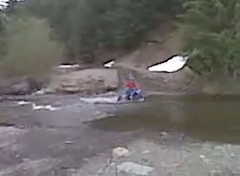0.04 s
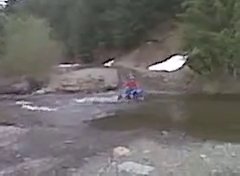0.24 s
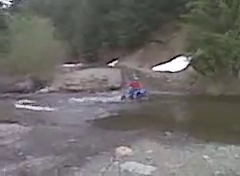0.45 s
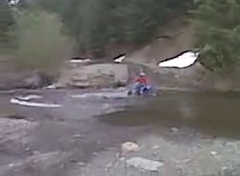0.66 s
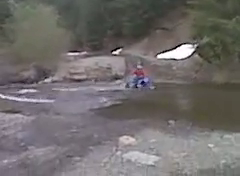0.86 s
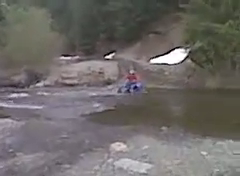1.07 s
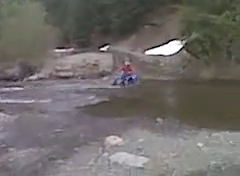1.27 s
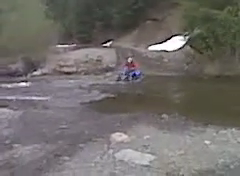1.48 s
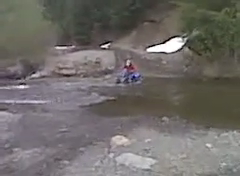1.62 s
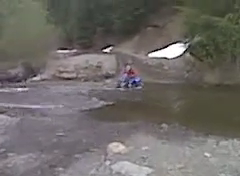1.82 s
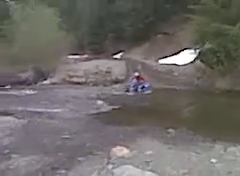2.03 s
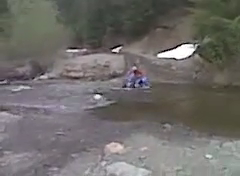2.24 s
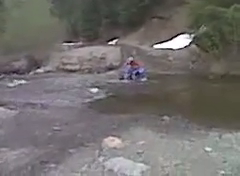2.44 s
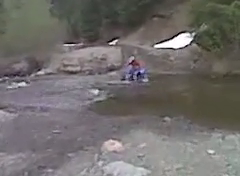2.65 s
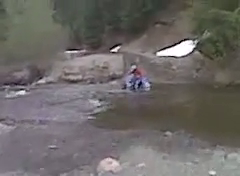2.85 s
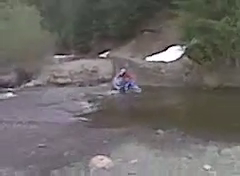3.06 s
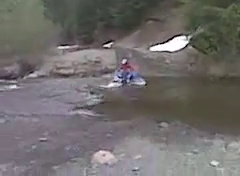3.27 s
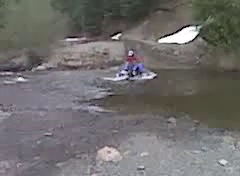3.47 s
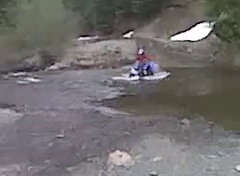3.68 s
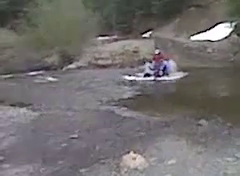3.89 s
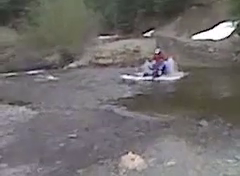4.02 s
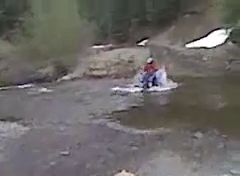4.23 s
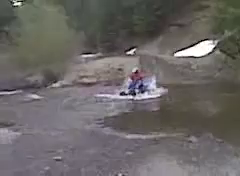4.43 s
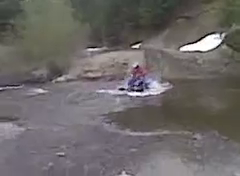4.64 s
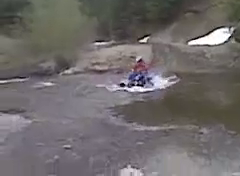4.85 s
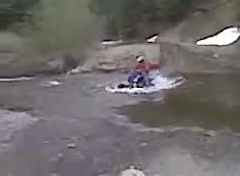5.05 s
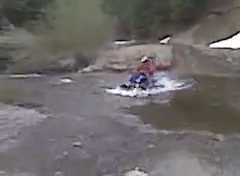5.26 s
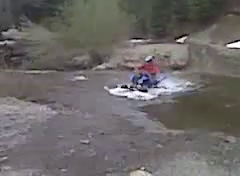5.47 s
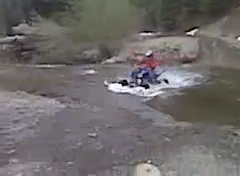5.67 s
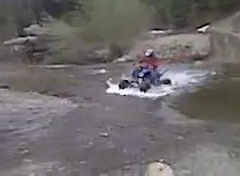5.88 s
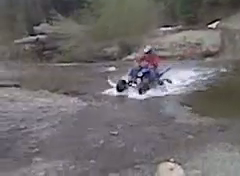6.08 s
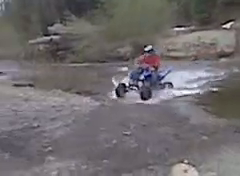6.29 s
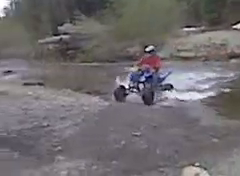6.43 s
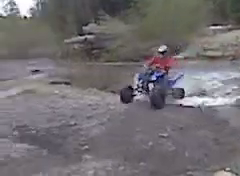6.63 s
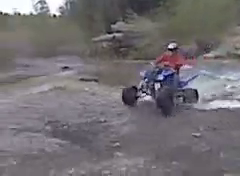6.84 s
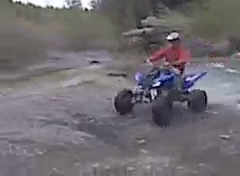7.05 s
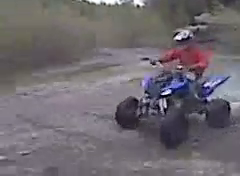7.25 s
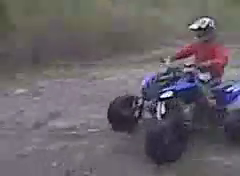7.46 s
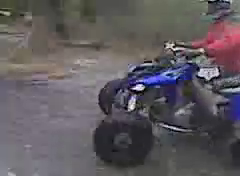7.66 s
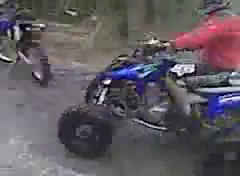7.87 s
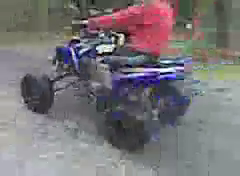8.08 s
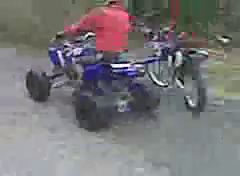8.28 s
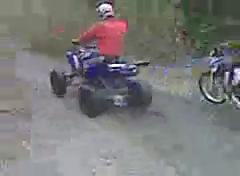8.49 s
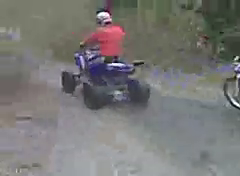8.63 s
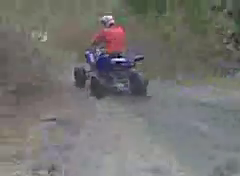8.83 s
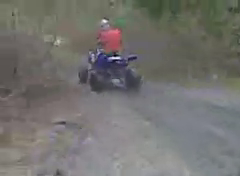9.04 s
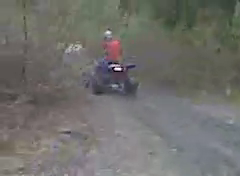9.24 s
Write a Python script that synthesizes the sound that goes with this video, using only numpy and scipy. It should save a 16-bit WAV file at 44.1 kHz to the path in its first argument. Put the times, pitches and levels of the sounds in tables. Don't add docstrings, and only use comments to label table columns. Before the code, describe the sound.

Open air beside a creek, captured by a small, boxy microphone with little treble. For the first 0.9 seconds there is faint running water and a very quiet, distant idle. Then a single-cylinder quad engine revs hard, climbing to a buzzy peak near 1.5 and dropping off by 1.8-2.2. Another raspy surge comes around 2.3, sags near 3.1, and a stronger one rises at 3.4, with a short blip at 4.1. From 4.3 to 7 it holds a rough, throbbing mid pitch, nearing through hissing water, with a push around 6.2. At 7.0-7.3 it revs up, wheels spit gravel, stones knock sharply and the frame rings. It passes extremely close at 7.7-8.1, loud and distorted, with metallic rattling. The throttle drops briefly around 8.1, gravel hisses, then a cracking exhaust pulls away, sputtering unevenly and slowing until 9.3.

```python
import sys
import numpy as np
from scipy import signal
from scipy.fft import rfft, irfft, next_fast_len
from scipy.io import wavfile
from scipy.ndimage import uniform_filter1d, map_coordinates

SR = 44100
rng = np.random.default_rng(int(sys.argv[2]) if len(sys.argv) > 2 else 0)


def master(y):
    cut = np.clip(np.atleast_2d(y).T, -1, 1)
    pcm = np.round(cut * 32767)
    wavfile.write(sys.argv[1], SR, pcm.astype(np.int16))


def invert_db(x):
    u = np.asarray(x, float) / 20
    return 10 ** u


N = 410571

# time in seconds, firing rate the crank then heads for in Hz.
THROTTLE = [(0, 25.7), (.899, 33), (1.06, 67.5), (1.471, 75), (1.63, 44), (1.8, 36), (2.12, 24.3),
            (2.355, 53.5), (2.6, 33.2), (2.711, 38), (3.09, 24.8), (3.38, 66), (3.7, 59.5), (3.98, 40),
            (4.1, 55), (4.31, 36.5), (4.6, 40), (4.89, 45), (5, 40), (5.33, 35), (5.57, 41), (5.98, 38.6),
            (6.14, 52), (6.4, 46.5), (6.65, 37), (7, 60), (7.13, 62), (7.3, 23.3), (7.5, 39.7), (7.744, 47),
            (8.1, 9.5), (8.201, 31), (8.69, 22.9)]
LOAD_DB = [-32, -2.5, -0.3, 5.5, -3.5, -3, -11, -1.5, -1.5, -0.8, -4.5, 0, 0.9, -0.3, 0.3, -1.3, -1, -4, -1,
           -0.7, -2, 1.5, 1.5, 1.5, 2, -0.5, 0.3, -1, -3.5, 1, -8, -1, -5.5]
FLYWHEEL_S, CABLE_S = .3, .08
BREATH_S = .035
# time in seconds, distance in m, side shown (0 nose, 1 flank, 2 tail).
PATH = [(0, 25.5, 0.16), (3.2, 28.3, 0.166), (4.8, 16.4, 0), (6.2, 11.4, 0), (6.9, 6.9, 0.25),
        (7.25, 5.35, 0.27), (7.5, 3.4, .5), (7.66, 2.7, .62), (7.735, 2.6, .8), (7.768, 1.9, 1),
        (8.045, 2.06, 1), (8.08, 2.8, 1.1), (8.13, 3.2, 1.26), (8.28, 3.3, 1.5), (8.52, 3.4, 2),
        (9.31, 5.8, 3.5)]
FAR_M, CRUISE_HZ = 30, 40
FIRING_DUE_S = [.95, .99, 1.032, 1.098, 1.153, 1.228, 1.308, 2.381, 2.441, 2.514, 2.61, 2.702, 2.8, 2.876, 2.954,
                3.041, 3.109, 7.748, 7.85, 7.948, 8.037, 8.294, 8.415, 8.511, 8.633, 8.701, 8.8, 8.941, 9.053,
                9.169, 9.287]
# time in seconds, unevenness from 0 to 1.
UNEVEN = [(0, .6), (.9, .12), (1.2, .1), (1.3, .03), (2.1, .04), (2.28, .25), (2.42, .08), (2.7, .06),
          (3.05, .1), (3.2, .35), (3.55, .25), (3.75, .1), (4.3, .1), (4.6, .35), (7, .3), (7.5, .6),
          (7.72, .12), (8.02, .12), (8.15, .7), (8.28, .12), (9.31, .3)]
# time in seconds, change in dB.
ODD_FIRINGS = [(8.3, 2), (8.331, 3.5), (8.36, 2.5), (8.635, 4.5), (8.701, -3.5), (8.801, 2.5), (8.838, -15),
               (8.872, 4.5), (8.906, 1.5), (8.98, -16), (9.016, 2), (9.089, -3), (9.129, -9), (9.169, 4),
               (9.21, -9), (9.25, -10.5), (9.291, -15)]
# delay in seconds, level in dB.
HEADER = [(.0041, 1), (.0079, 1), (0.0122, 1.5)]
# dB far off at plain load, share of load, share of nearness, dB gained at the flank,
# narrowness of that beam, dB gained behind.
THUMP = (-24, 0.77, 0.302, -18.5, 1.14, -8)
PIPE = (-28, 1.38, 0.0185, 17.5, 3.5, -2)
TAIL = (-29, 1.74, 0.56, -8.5, 2.5, 4.5)

# pitch in Hz, width in Hz, level in dB.
SILENCER = [(212.5, 80, 1.96), (298.4, 82, 4.5)]
# pitch in Hz, width in Hz, level in dB.
PIPE_FRONT = [(443, 280, -1), (592, 120, 0.013)]
# pitch in Hz, width in Hz, level in dB.
PIPE_FLANK = [(616.8, 54, 0)]
# pitch in Hz, width in Hz, level in dB.
TAIL_BEHIND = [(773, 115, 2), (1020, 400, -4.5)]
# pitch in Hz, width in Hz, level in dB.
CASING = [(2190, 190, -9.5), (2440, 320, 4.5), (2640, 200, 0.5), (3280, 160, -1)]
# pitch in Hz, width in Hz, level in dB.
VALVES = [(3037, 400, 0)]
# pitch in Hz, width in Hz, level in dB.
CRACK = [(1970, 570, 1.5), (2700, 280, 4), (3160, 210, -13)]
# time in seconds, pitch in Hz, level in
# dB.
BARK = [(.9, 850, 1), (1.2, 850, 1), (1.4, 825, 2), (1.6, 885, 1), (1.8, 945, 0), (2.0, 890, 0),
        (2.4, 945, 4), (2.48, 940, 1), (2.54, 825, 2), (2.64, 900, 6), (2.74, 830, 5), (2.88, 830, 3),
        (2.97, 890, 1), (3.1, 850, -4), (3.45, 870, 0), (3.8, 870, -3), (3.97, 900, 2), (4.1, 880, -3),
        (6, 870, 0), (6.5, 870, -4), (6.7, 930, -1), (6.9, 870, -3), (7.1, 900, 0), (8, 850, 0)]
BARK_HZ, BARK_STEP_HZ, BARK_WIDE_HZ, BARK_DRAWN = (820, 885, 950), 65, 115, .4
WADING, WADING_DULLS = (4.3, 2.3, 0), 0.49
SHUT = (1.68, .12, -7)
CLATTER_DB, CLATTER_DB_PER_OCTAVE = -37, 9
VALVE_FLOAT_HZ, IN_STEP, IN_STEP_BEHIND = 58, .13, .45
# start in seconds, hold in seconds, level in dB.
DRONE = [(1.209, 0.091, -33), (1.3, 0.14, -29.5), (1.54, .12, -26.5), (1.7, 0.07, -29.5), (1.87, 0.22, -40),
         (2.551, 0.34, -43.5), (3.538, 0.21, -30), (3.88, 0.076, -27.5), (4.061, 0.3, -19.5),
         (6.3, 0.16, -31.5), (7.019, 0.33, -30.5)]
# start in seconds, hold in seconds, level in dB,
# multiple of the firing rate.
HOWL = [(1.36, .2, -36, 8), (1.38, .2, -37, 7), (1.4, .2, -38, 9), (1.34, .15, -38, 14),
        (1.36, .22, -36, 11), (1.45, .12, -35, 15), (1.52, .1, -33, 10), (1.52, .1, -32, 14),
        (1.6, .06, -36, 12), (1.71, .12, -33, 8), (1.75, .1, -38, 11), (1.78, .05, -37, 18),
        (1.8, .3, -35, 6), (1.9, .06, -37, 12), (2.62, .12, -39, 12), (2.7, .1, -37, 7),
        (2.93, .13, -35, 7), (3.47, .1, -33, 6), (3.68, .06, -30, 5), (3.76, .22, -34, 10),
        (3.8, .2, -37, 12), (3.88, .06, -34, 6), (4.1, .13, -31, 5), (4.42, .1, -32, 6),
        (4.55, .12, -33, 7), (4.95, .2, -33, 8), (5.05, .12, -31, 7), (5.42, .06, -33, 16),
        (5.55, .2, -35, 6), (5.6, .2, -32, 7), (6, .15, -30, 5), (6, .13, -31, 6), (6.24, .16, -29, 5),
        (6.2, .22, -29, 7), (6.75, .25, -35, 6), (6.75, .25, -31, 7), (6.75, .25, -33, 8)]
ATTACK_S, RELEASE_S = .06, .11

# pitch in Hz, level in dB.
WATER = [(35, -46), (60, -17), (129, -11.5), (225, -8.5), (300, -2), (414, -9), (532, -0.5), (1150, -1),
         (1560, -8.5), (2150, -4.5), (3240, -11.5), (4310, -33.5), (5600, -58.5), (9480, -120)]
CREEK_DB, SPRAY_DB, SPRAY_DB_PER_OCTAVE, SPRAY_NEAR = -49.5, -47, 14, 0.94
# start in seconds, hold in seconds, level in dB.
WHEELSPIN = [
    (7.127, 0.19, -38),
    (8.1, 0.16, -37),
]
# start in seconds, hold in seconds, level in dB, pitch in Hz.
FRAME = [
    (6.37, 0.033, -30, 1256),
    (6.55, 0.45, -31.5, 1238),
    (7.03, 0.24, -17, 1256),
    (7.28, 0.07, -18.5, 1265),
    (7.5, 0.17, -28, 1235),
    (7.74, 0.1, -20.5, 1254),
]
# start in seconds, hold in seconds, level in dB, pitch in Hz.
RACK = [
    (6.65, .3, -31, 2613),
    (7.2, .03, -23, 2620),
    (7.34, 0.021, -25.5, 2700),
    (7.5, 0.0406, -29, 2550),
    (7.8, .15, -21.5, 2354),
    (8.01, 0.031, -16.5, 2230),
    (8.09, 0.018, -25, 2605),
    (8.2, 0.076, -23, 2080),
]
# time in seconds, peak in dB.
STONES = [
    (7.1495, 1),
    (7.2237, -1),
    (7.2555, 2.5),
    (7.44, -6),
    (7.52, -6),
]
# pitch in Hz, width in Hz, level in dB.
PLATE = [(930, 440, 5), (2200, 470, -1.5)]
PREAMP_TOP, PREAMP_KNEE = 1.1, 7


def steady(x):
    power = uniform_filter1d(uniform_filter1d(x ** 2, SR // 9), SR // 9)
    return x / np.sqrt(np.abs(power) + 1e-12)


def curves(rows):
    s, *cols = np.transpose(rows)
    return [np.interp(np.arange(N) / SR, s, c) for c in cols]


def wobble(rate):
    knots = rng.standard_normal(int(N * rate / SR) + 4)
    return map_coordinates(knots, [np.arange(N) * rate / SR])


def swell(start, hold, db):
    t = np.arange(N) / SR - start
    outside = np.maximum(-t / ATTACK_S, (t - hold) / RELEASE_S)
    return invert_db(db - 20 * np.maximum(outside, 0))


def lagged(x, seconds):
    keep = np.exp(-1 / (seconds * SR))
    return x[0] + signal.lfilter([1 - keep], [1, -keep], x - x[0])


def filtered(x, response):
    m = next_fast_len(N + SR // 2)
    return irfft(rfft(x, m) * response(np.fft.rfftfreq(m, 1 / SR)), m)[..., :N]


def ringing(x, modes):
    def response(f):
        return sum(invert_db(db) * 1j * f * w / (c * c - f * f + 1j * f * w) for c, w, db in modes) ** 2
    return filtered(x, response)


def echoes(x, taps):
    return sum(invert_db(db) * np.pad(x, (int(abs(s) * SR), 0))[:N] for s, db in taps)


def patchy(depth_db, wide, long):
    z = signal.stft(rng.standard_normal(N), nperseg=512)[2]
    field = uniform_filter1d(rng.standard_normal(z.shape), wide, axis=0)
    field = uniform_filter1d(field, long, axis=1)
    return signal.istft(z * invert_db(depth_db * field / field.std()), nperseg=512)[1][:N]


def riding():
    s, aim = np.transpose(THROTTLE)
    move = np.clip(np.searchsorted(s, np.arange(N) / SR) - 1, 0, None)
    rate = uniform_filter1d(lagged(aim[move], FLYWHEEL_S), int(CABLE_S * SR))
    load_db = lagged(np.array(LOAD_DB)[move], BREATH_S)
    distance, side = curves(PATH)
    return rate, load_db, 20 * np.log10(FAR_M / distance), np.clip(side, 0, 2)


def crank(rate):
    turns = np.cumsum(rate) / SR
    nudge = np.unwrap(-turns[(np.array(FIRING_DUE_S) * SR).astype(int)] % 1, period=1)
    return turns + np.interp(np.arange(N) / SR, FIRING_DUE_S, nudge)


def firings(turns, uneven):
    fires = np.flatnonzero(np.diff(np.floor(turns))) - int(0.002556 * SR)
    chance = np.clip(rng.standard_normal((len(fires), 2)), -2, 2)
    shift = (uneven[fires] * .0006 * SR * chance[:, 0]).astype(int)
    late = np.clip(fires + shift, 0, N - 1)
    return np.bincount(late, invert_db(4.7 * uneven[fires] * chance[:, 1]), N)


def part_level(part, load_db, near_db, broadside, behind):
    db, loaded, near, flank_db, narrow, behind_db = part
    level = db + loaded * load_db + near * near_db
    level = level + flank_db * broadside ** narrow + behind_db * behind
    return level + 1.5 * (1 - .8 * broadside) * wobble(10)


def intake_drone(turns):
    hum = sum(swell(*row) for row in DRONE) * np.sin(8 * np.pi * turns)
    howl = sum(swell(s, hold, db + 3) * np.sin(2 * np.pi * k * turns) for s, hold, db, k in HOWL)
    return invert_db(3 + 1.5 * wobble(25)) * hum + invert_db(.9 * wobble(20)) * howl


def casing_clatter(puffs, odd_db, behind, rate):
    rattle = steady(ringing(patchy(4.1, 2, 12), CASING))
    spit = rng.standard_normal(N)
    valves = steady(ringing(puffs * spit, VALVES))
    cracks = echoes(puffs ** 0.67 * invert_db(odd_db / 2), [(.004, 0)])
    ticks = (1 - behind) * valves + behind * steady(ringing(cracks * spit, CRACK))
    floating = np.clip((rate - VALVE_FLOAT_HZ) / 3, 0, 1)
    in_step = IN_STEP + IN_STEP_BEHIND * behind + .6 * floating
    return np.sqrt(1 - in_step) * rattle + np.sqrt(in_step) * ticks


def engine():
    rate, load_db, near_db, side = riding()
    turns = crank(rate)
    uneven, = curves(UNEVEN)
    behind = np.clip((side - 1.2) / .4, 0, 1)
    broadside = np.clip(1 - abs(side - 1), 0, 1)
    flank = broadside + behind / 2
    thump_db, pipe_db, tail_db = (part_level(part, load_db, near_db, broadside, behind)
                                  for part in (THUMP, PIPE, TAIL))

    blows = firings(turns, uneven)
    puffs = signal.lfilter([1], [1, -np.exp(-1 / (.008 * SR))], blows)
    drawn_out = blows + echoes(blows, HEADER)
    odd_db = sum(db * (abs(np.arange(N) / SR - s) < .016) for s, db in ODD_FIRINGS)
    outlet = echoes(blows * invert_db(odd_db), [(.0045, 0)])

    def exhaust(source, modes, rough):
        share = np.clip(rough * uneven, 0, 1)
        clean = steady(ringing(source, modes))
        gas = (puffs + 1.1 * puffs.mean()) * rng.standard_normal(N)
        return np.sqrt(1 - share) * clean + np.sqrt(share) * steady(ringing(gas, modes))

    thump = exhaust(echoes(blows + .6 * (1 - behind) * drawn_out, [(.005, 0)]), SILENCER, rough=1.1)

    front = exhaust(blows + .45 * drawn_out, PIPE_FRONT, rough=1.6)
    beside = exhaust(echoes(blows, [(.002, 0)]), PIPE_FLANK, rough=.8)
    pipe = np.sqrt(1 - flank) * front + np.sqrt(flank) * beside
    pipe = pipe * (1 - 0.12 * swell(*WADING) - swell(*SHUT))

    bark_hz, bark_db = curves(BARK)
    bark = 0
    for hz in BARK_HZ:
        share = np.clip(1 - abs(np.clip(bark_hz, 820, 950) - hz) / BARK_STEP_HZ, 0, 1)
        note = exhaust(blows + BARK_DRAWN * drawn_out, [(hz, BARK_WIDE_HZ, 0)], rough=1.7)
        bark = bark + np.sqrt(share) * note
    tail = np.sqrt(1 - behind) * invert_db(bark_db) * bark
    tail = tail + np.sqrt(behind) * exhaust(outlet, TAIL_BEHIND, rough=.6)
    tail = tail * (1 - np.clip(WADING_DULLS * swell(*WADING), 0, 1))

    pulses = invert_db(thump_db - 3.0) * thump + invert_db(pipe_db - 1.0 - 15 * behind) * pipe + invert_db(tail_db - 3.5) * tail

    def open_end(f):
        return (1j * f / 175) ** 2 / (1 + 1.1j * f / 175 - (f / 175) ** 2)

    rumble = steady(ringing(rng.standard_normal(N), [(100, 170, 0)]))
    rumble = invert_db(uniform_filter1d(thump_db, SR // 4) - 19.5) * rumble
    clatter_db = CLATTER_DB + CLATTER_DB_PER_OCTAVE * np.log2(rate / CRUISE_HZ) + near_db
    clatter_db = clatter_db - 0.8 * broadside ** 3 + 0.32 * load_db + 0.46 * wobble(9)
    clatter = invert_db(clatter_db - 1.0) * casing_clatter(puffs, odd_db, behind, rate)
    return filtered(pulses, lambda f: open_end(f) ** 2) + intake_drone(turns) + rumble + clatter


def wash():
    f, db = np.transpose(WATER)
    droplets = patchy(1.87, 4, 8) * invert_db(1.6 * wobble(300))
    hiss = filtered(droplets, lambda hz: invert_db(np.interp(np.log(hz + 1), np.log(f + 1), db)))
    rate, _, near_db, _ = riding()
    spray_db = SPRAY_DB + SPRAY_DB_PER_OCTAVE * np.log2(rate / CRUISE_HZ)
    spray_db = spray_db + SPRAY_NEAR * near_db + 0.69 * wobble(12)
    thrown = invert_db(spray_db) + sum(swell(*row) for row in WHEELSPIN)
    return np.hypot(invert_db(CREEK_DB), thrown) * invert_db(10.5 + 0.12 * wobble(6.7)) * hiss / hiss.std()


def singing(rows, drift_hz, flutter_db):
    t = np.arange(N) / SR
    drift = drift_hz * np.cumsum(wobble(60)) / SR
    tones = sum(swell(s, hold, db) * np.sin(2 * np.pi * (hz * t + drift)) for s, hold, db, hz in rows)
    return invert_db(flutter_db * wobble(40)) * tones


def stones():
    hits = np.zeros(N)
    for s, db in STONES:
        hits[int(s * SR)] = invert_db(db)
    knocks = ringing(hits, PLATE)
    return knocks * hits.max() / abs(knocks).max()


def scene():
    bike = engine() + stones()
    bike = bike + singing(FRAME, drift_hz=38.17, flutter_db=2.9) + singing(RACK, drift_hz=63.0, flutter_db=3.5)
    banks = echoes(bike, [(.0047, -23.5), (.017, -22.5), (.041, -14)])
    return (bike + banks + wash())[None]


def top_cut(x):
    return signal.sosfilt(signal.butter(12, 16800, fs=SR, output="sos"), x)


def record(dry):
    squeezed = dry / (1 + abs(dry / PREAMP_TOP) ** PREAMP_KNEE) ** (1 / PREAMP_KNEE)
    band = filtered(squeezed, lambda hz: invert_db(-np.clip((hz - 3500) / 900, 0, 9) ** 2 * 15.3) * (hz < 4460))
    clipped = np.clip(band, -.985, .985)
    softened = filtered(clipped, lambda hz: invert_db(-np.clip(hz / 5000 - 1, 0, 9) * 2.5) * (hz < 16800))
    return top_cut(softened)


dry = scene()
out = record(dry)
master(out)
```